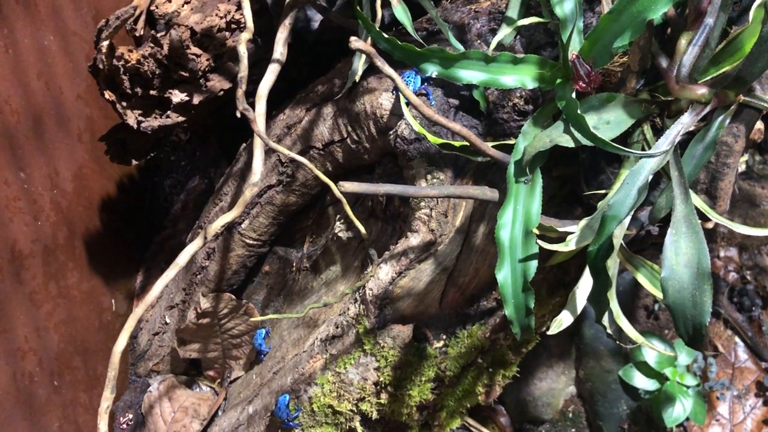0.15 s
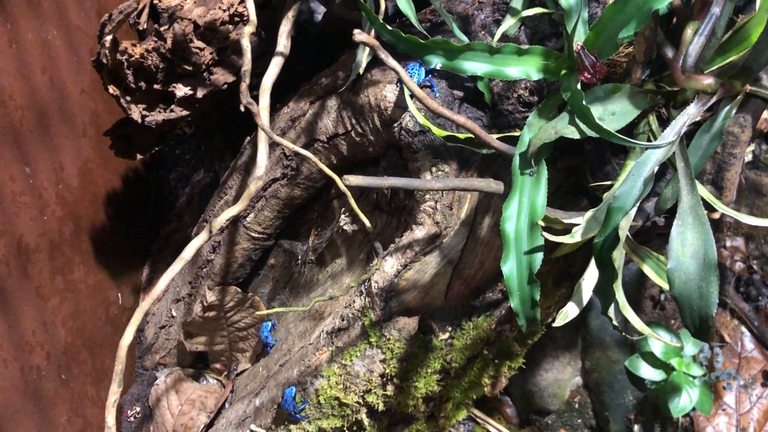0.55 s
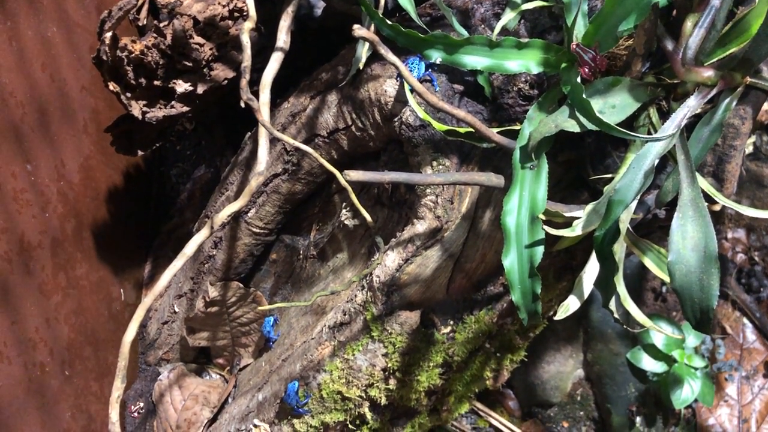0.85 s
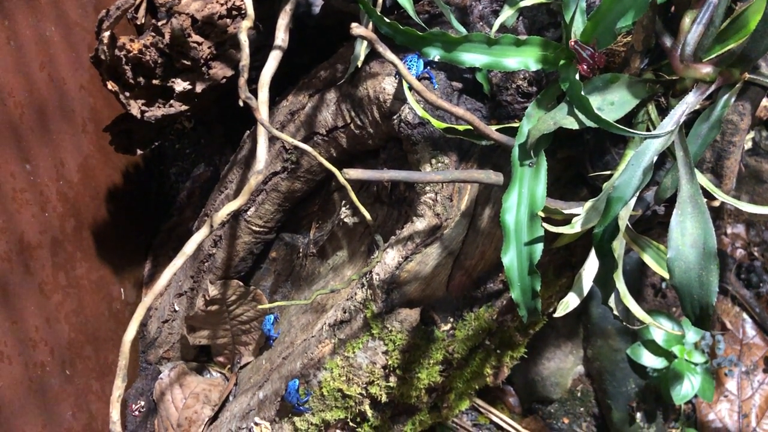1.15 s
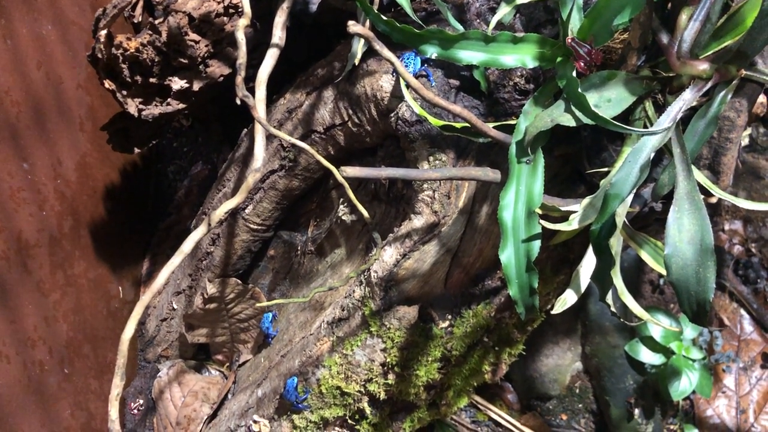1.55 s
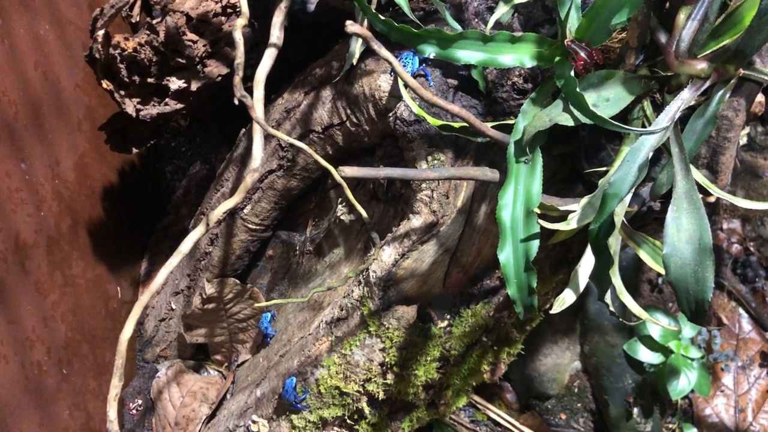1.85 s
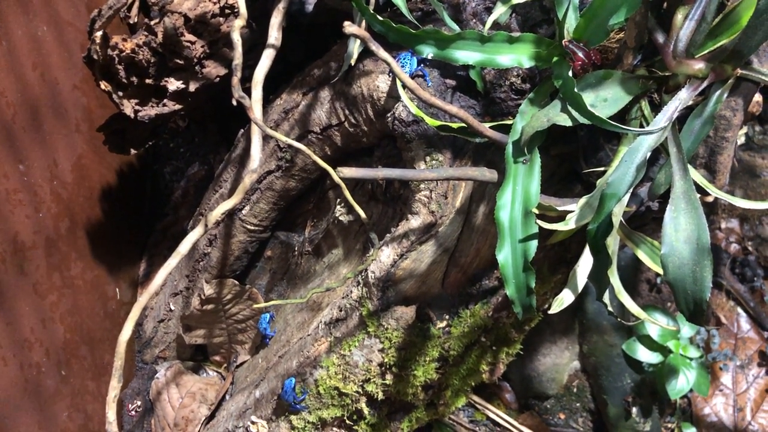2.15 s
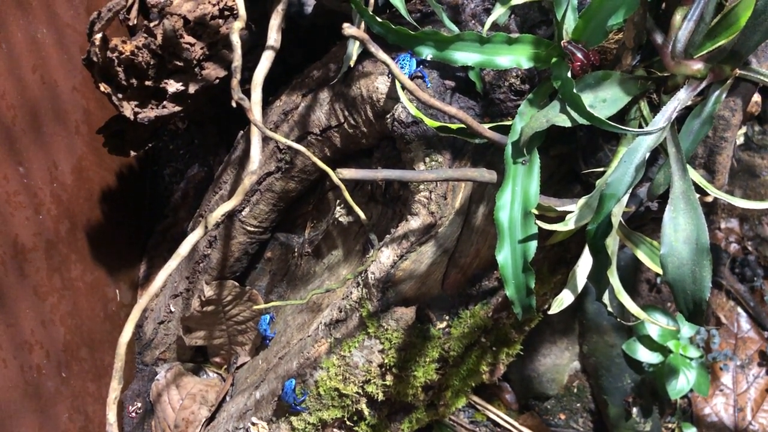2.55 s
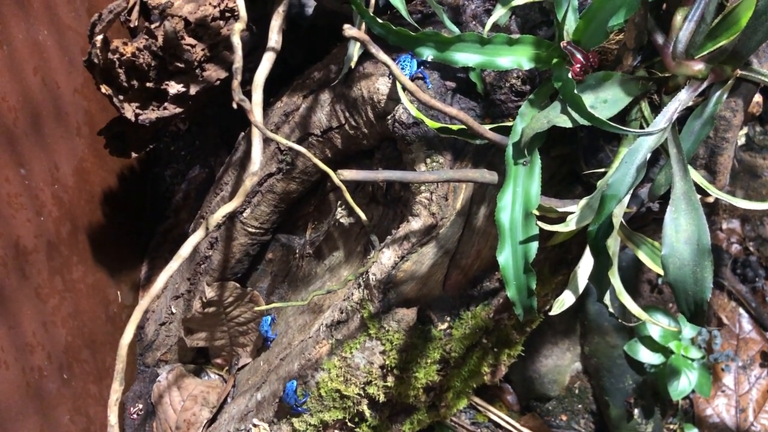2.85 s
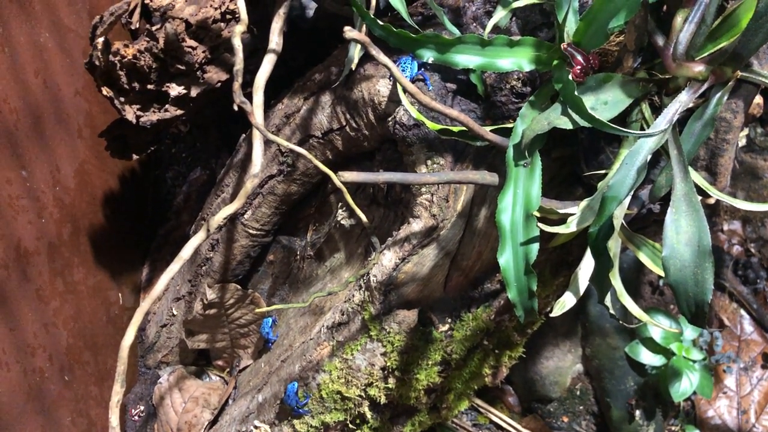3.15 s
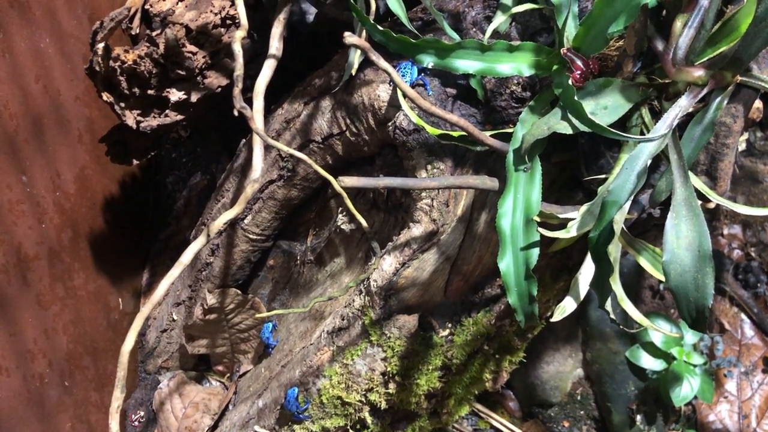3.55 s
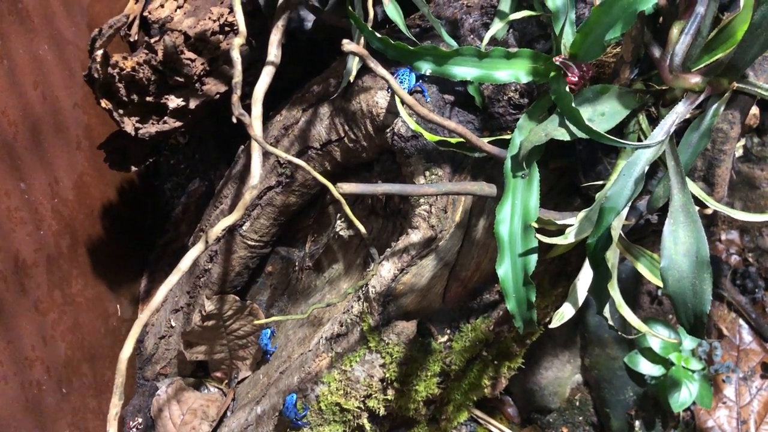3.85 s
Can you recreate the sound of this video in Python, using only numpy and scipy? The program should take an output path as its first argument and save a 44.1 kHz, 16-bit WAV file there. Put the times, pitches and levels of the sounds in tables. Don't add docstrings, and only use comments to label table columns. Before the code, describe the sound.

Two tiny frogs give fast shrill trills in turn over soft ventilation noise and faint hum

```python
import sys
import numpy as np
from scipy import signal
from scipy.io import wavfile
from scipy.ndimage import uniform_filter1d

SR = 44100
rng = np.random.default_rng(int(sys.argv[2]) if len(sys.argv) > 2 else 0)


def store_pcm(level_fs):
    pcm = np.round(np.clip(level_fs, -1, 1) * 32767).astype(np.int16)
    wavfile.write(sys.argv[1], SR, np.atleast_2d(pcm).T)


def level_to_linear(level):
    exponent = np.asarray(level, float) / 20
    return 10 ** exponent


N = 176400

# (frequency [Hz], width [Hz], level [dB])
MOTOR_TONES = [
    (47.4, 18, -73.5),
    (201, 19.5, -63.5),
    (288.1, 4.8, -65),
    (459.7, 13, -69),
]
# (time [s], decay [s], frequency [Hz], width [Hz], level [dB])
RUMBLE = (0.1, 0.66, 197, 94, -56.5)
# (frequency [Hz], density [dB per Hz])
VENT_RUSH = [(22, -40), (36, -5.5), (55, 0.5), (110, -6), (200, -7), (640, -8), (1500, -17), (2200, -41)]
# (frequency [Hz], density [dB per Hz])
VENT_HISS = [(600, -25), (1400, -7.5), (2300, -6), (3000, -12), (6000, -13), (9000, -20.5), (13000, -28),
             (15700, -35)]
# (time [s], length [s], level [dB], pitch [Hz], glide [Hz])
CHIRPS = [(0.303, 0.068, -49, 7770, -47), (0.323, 0.087, -54, 8040, 6), (0.436, 0.1, -52.5, 7700, -150),
          (.75, 0.09, -55.5, 7660, 5), (0.756, 0.13, -61, 8740, 0), (0.75, 0.078, -60, 8250, 0),
          (1.004, 0.14, -48, 7510, 137), (1.199, .05, -56, 7580, 13), (1.574, 0.13, -48, 7770, 99),
          (2.376, .08, -55.5, 7800, 8), (2.417, .1, -58.5, 7220, -12), (2.674, 0.09, -57, 7440, 5),
          (2.927, 0.089, -44.5, 7590, 57.5), (2.98, 0.12, -60.5, 8000, 5), (3.699, 0.17, -52.5, 7590, -55),
          (3.741, 0.093, -62, 7360, -8), (3.797, 0.042, -46.5, 7920, -15.5)]
# (time [s], level [dB], pitch [Hz], length [s])
TICK = (1.688, -47, 4640, .006)
# (time [s], start level [dB])
FAR_PULSES = [(1.7316, -32), (1.7787, -30), (1.8246, -30.5), (1.884, -31), (1.9329, -32), (1.9843, -32.5),
              (2.0346, -32), (2.082, -32.5), (2.1354, -31.5), (2.187, -31.5), (2.2343, -32.5), (2.2871, -32),
              (2.3434, -33), (2.3938, -32.5), (2.4468, -33), (2.5003, -32.5), (2.5503, -32), (2.599, -32),
              (2.6502, -32.5), (2.7005, -32.5),
              (2.7528, -32.5), (2.8053, -32.5), (2.8575, -33), (2.9072, -32), (2.9582, -32.5),
            (3.0092, -32.5), (3.0593, -32), (3.1125, -32.5), (3.166, -33), (3.2181, -32.5), (3.2707, -32.5),
            (3.322, -32), (3.3728, -32.5), (3.4253, -32.5), (3.4761, -32), (3.529, -32), (3.5829, -32.5),
            (3.6373, -32.5), (3.6963, -33.5)]
# (time [s], start level [dB])
NEAR_PULSES = [
    (-.031, -29.5),
               (0.0208, -30), (0.0735, -30), (0.1268, -30), (0.179, -30), (0.2319, -30), (0.2835, -30),
              (0.3359, -30), (0.39, -30), (0.4429, -30), (0.4953, -29.5), (0.5482, -30), (0.6019, -30),
              (0.6568, -30.5), (0.7097, -30.5), (0.7629, -30.5), (0.816, -30), (0.8705, -30), (0.9239, -30),
              (0.9775, -30.5), (1.0303, -30), (1.0817, -30), (1.1405, -30), (1.1998, -30.5)]
# (low pitch [Hz], aim pitch [Hz], sweep [s], pulse [s], swell [dB]); pitch is the second partial's
FAR_VOICE = (4140, 4690, .0135, .0158, 14.8)
NEAR_VOICE = (4310, 5031, .0161, .0148, 11.2)
# (multiple [1], level [dB])
FAR_PARTIALS = [(1, -29.5), (2, -0.5), (3, -20.5), (4, -17), (5, -20), (6, -35)]
NEAR_PARTIALS = [(1, -38.5), (2, 2.5), (3, -21.5), (4, -26.5), (5, -44), (6, -41), (7, -40)]
# (delay [ms], share of the direct sound [1])
FAR_WALLS = [(3.04, .3), (4.6, .79), (8.05, .45), (10.14, .23), (13.99, .22), (17.17, .24), (21.16, .17),
             (26.33, .2)]
NEAR_WALLS = [(0.7, 0.21), (0.88, 0.22), (2.56, 1.14), (7.41, 0.33), (11.04, 0.27), (13.47, 0.31),
              (15.67, 0.26), (19.64, 0.26), (23.58, 0.22), (29.09, 0.13)]
# (direct [dB], diffuse [dB], T60 [s], diffuse gap [s], overtone swell [dB],
# scoop [Hz], kick [dB])
FAR_MIX = (-5.5, -12, 0.38, .018, -7, 264, 2.5)
NEAR_MIX = (-6, -13, 0.34, .018, -7, 58, -1.5)
# (frequency [Hz], width [Hz], level [dB])
NOOK = (11700, 48, 21.3)


def evened(x):
    return x / np.sqrt(np.mean(x ** 2) + 1e-20)


def add(mix, s, sound):
    at = round(s * SR)
    part = mix[at:][:len(sound)]
    part += sound[:len(part)]


def resonate(x, hz, width):
    r = np.exp(-np.pi * width / SR)
    w = np.exp(2j * np.pi * hz / SR)
    return 2 * signal.lfilter([1 - r], [1, -r * w], x).real


def drift(count, hz):
    noise = rng.standard_normal(count + 2000)
    smooth = signal.lfilter([1], [1, -2 * np.exp(-hz * 6 / SR), np.exp(-hz * 12 / SR)], noise)
    return evened(smooth[2000:])


def tail(x, t60, gap_s):
    t = np.arange(SR) / SR
    taps = rng.standard_normal(SR) * level_to_linear(-60 * t / t60) * np.clip(t / gap_s - 1, 0, 1)
    return signal.fftconvolve(x, taps / np.linalg.norm(taps))[:len(x)]


def wavering_tone(hz, width):
    once = resonate(rng.standard_normal(N), hz, width)
    return evened(resonate(once, hz, width))


def motor_hum():
    tones = sum(level_to_linear(db) * wavering_tone(hz, width) for hz, width, db in MOTOR_TONES)
    s, decay, hz, width, db = RUMBLE
    t = np.arange(N) / SR
    return tones + level_to_linear(db) * wavering_tone(hz, width) * np.exp(-abs(t - s) / decay)


def ventilation(colour_points, level_db, patchy_db):
    frames, hz = N // 256 + 5, np.fft.rfftfreq(1024, 1 / SR)
    real, imag, patches = rng.standard_normal((frames, 513, 3)).T
    patches = uniform_filter1d(patches, size=10, axis=0)
    patches = evened(uniform_filter1d(patches, size=14, axis=1))
    f, db = np.transpose(colour_points)
    above = db[-1] - 60 * (f[-1] < 5000)
    colour = np.interp(np.log(hz + 1), np.log(f + 1), db, left=-60, right=above)
    spectrum = (real + 1j * imag) * level_to_linear(colour[:, None] + patchy_db * patches)
    noise = signal.istft(spectrum, nperseg=1024, noverlap=768)[1][:N]
    return level_to_linear(level_db) * evened(noise)


def distant_chirps():
    spread_hz, warble_hz, octave_db = 106, 60.6, -25
    dry, octave = np.zeros(N), np.zeros(N)
    for s, length, db, hz, glide in CHIRPS:
        u = np.arange(0, length, 1 / SR) / length
        pitch = hz + glide * (u - .5) + spread_hz * drift(len(u), warble_hz)
        turn = 2 * np.pi * np.cumsum(pitch) / SR
        swell = np.sin(np.pi * u ** .6) ** .55
        add(dry, s, level_to_linear(db + 1.5) * swell * np.sin(turn))
        add(octave, s, level_to_linear(octave_db + 2 * db + 51) * swell ** 2 * np.sin(2 * turn))
    return level_to_linear(-6.5) * dry + tail(dry, t60=0.82, gap_s=0.0013) + tail(octave, t60=0.38, gap_s=.004)


def pulse(low_hz, top_hz, sweep_s, length, swell_db, over_db, scoop_hz, kick_db, partials):
    rise_s, fall_s, scoop_s, kick_s = .0006, .003, .0015, .0027
    wobble, rough = .001, .05
    t = np.arange(0, length, 1 / SR)
    hz = top_hz - (top_hz - low_hz) * np.exp(-t / sweep_s) - scoop_hz * np.exp(-t / scoop_s)
    turn = np.pi * np.cumsum(hz * (1 + wobble * rng.standard_normal())) / SR
    shape = np.clip(t / rise_s, 0, 1) * np.clip((length - t) / fall_s, 0, 1)
    shape = shape * level_to_linear(swell_db * t / length + kick_db * np.exp(-t / kick_s))
    voice = np.zeros(len(t))
    for k, db in partials:
        level = level_to_linear(db + (k > 2) * over_db * t / length)
        unsteady = 1 + rough * (k - 1) * drift(len(t), 235)
        voice += level * np.sin(k * turn) * unsteady
    return shape * voice


def aborted_tick():
    s, db, hz, length = TICK
    out = np.zeros(N)
    partials = [(1, 1), (1.3, -6), (1.65, -2), (2, 2), (3, -22)]
    add(out, s, level_to_linear(db) * pulse(hz, hz, .01, length, 0, 0, 0, 0, partials))
    return out + level_to_linear(-12) * tail(out, t60=.08, gap_s=.003)


def frog(pulses, voice, partials, reflections, mix, start_s):
    low_hz, top_hz, sweep_s, length, swell_db = voice
    direct_db, diffuse_db, t60, gap_s, over_db, scoop_hz, kick_db = mix
    dry = np.zeros(N + SR)
    for s, db in pulses:
        cold = np.exp(-(s - start_s) / 0.2)
        squeeze = pulse(low_hz * (1 - .025 * cold), top_hz * (1 - .04 * cold), sweep_s,
                        length * (1 - 0.24 * cold ** 3),
                        swell_db - 41.5 * cold,
                        over_db, scoop_hz, kick_db, partials)
        add(dry, 1 + s - .0008, level_to_linear(db + direct_db + 7.5 * cold) * squeeze)
    walls = np.zeros(2000)
    for ms, share in reflections:
        walls[round(ms * SR / 1000)] = share
    soaked = 0.5 * dry + 0.5 * signal.filtfilt(*signal.butter(4, 7800, fs=SR), dry)
    echoes = signal.oaconvolve(soaked, walls)[:N + SR]
    dull = signal.lfilter(*signal.butter(2, 6000, fs=SR), dry)
    late_room = level_to_linear(-7.5) * tail(dull, t60=0.47, gap_s=0.012)
    diffuse = level_to_linear(diffuse_db + 4.5) * (tail(dull, t60, gap_s) + late_room)
    return (dry + echoes + diffuse)[SR:]


def nook_ring(x):
    hz, width, db = NOOK
    ring = resonate(x, hz, 600)
    ring = resonate(ring, hz, width)
    return level_to_linear(db) * resonate(ring, hz, 600)


def scene():
    room = motor_hum() + ventilation(VENT_RUSH, -51, 0.83) + ventilation(VENT_HISS, -56, 1.0)
    far = frog(FAR_PULSES, FAR_VOICE, FAR_PARTIALS, FAR_WALLS, FAR_MIX, start_s=1.722)
    near = frog(NEAR_PULSES, NEAR_VOICE, NEAR_PARTIALS, NEAR_WALLS, NEAR_MIX, start_s=-5)
    near = near + nook_ring(near)
    return (room + distant_chirps() + aborted_tick() + far + near)[None]


def roll_off(x):
    return signal.sosfilt(signal.butter(12, 15710, fs=SR, output="sos"), x)


def record(dry):
    bass_cut = signal.butter(4, 38, "high", fs=SR, output="sos")
    mix = signal.sosfilt(bass_cut, dry)
    band_limit = signal.firwin(511, 15750, window=("kaiser", 9), fs=SR)
    mix = signal.oaconvolve(mix, band_limit[None], "same")
    return roll_off(mix)


dry = scene()
out = record(dry)
store_pcm(out)
```